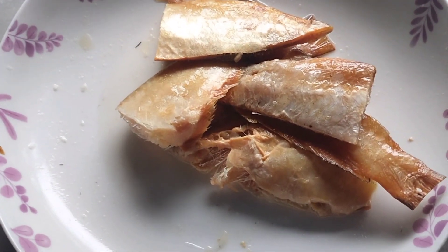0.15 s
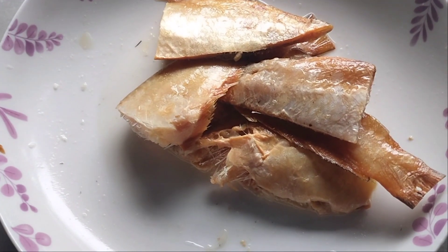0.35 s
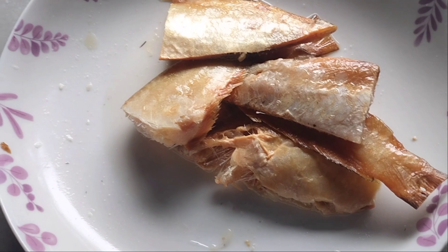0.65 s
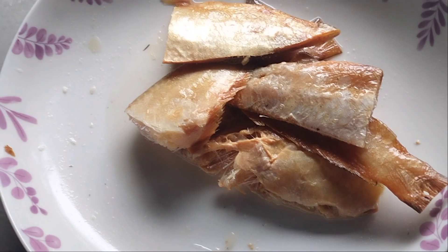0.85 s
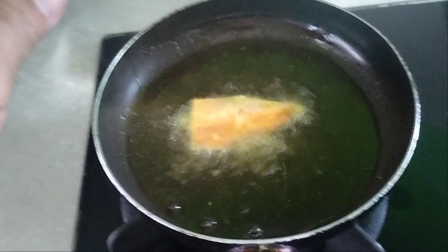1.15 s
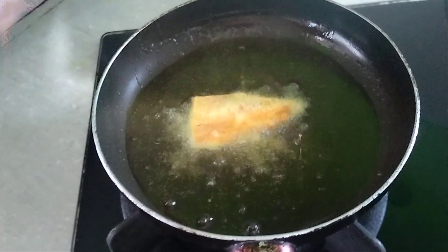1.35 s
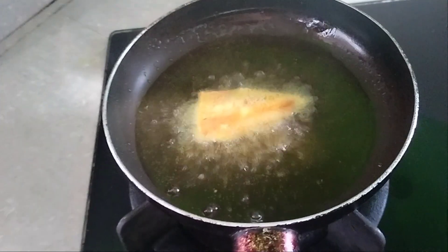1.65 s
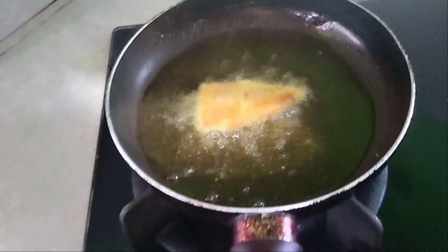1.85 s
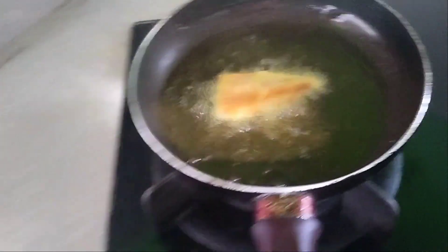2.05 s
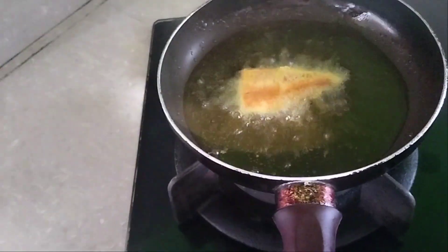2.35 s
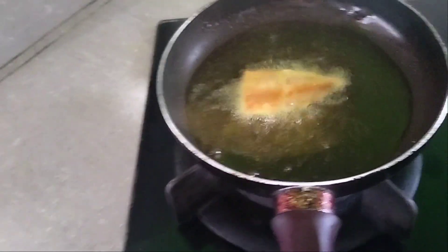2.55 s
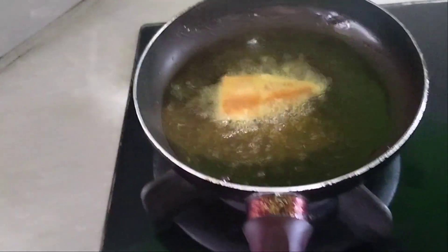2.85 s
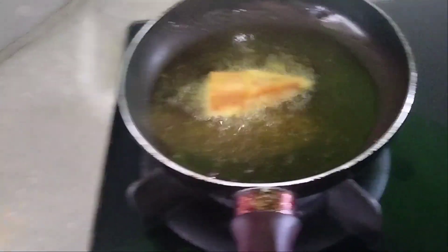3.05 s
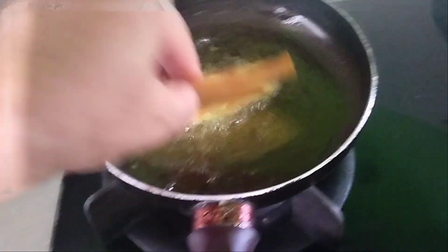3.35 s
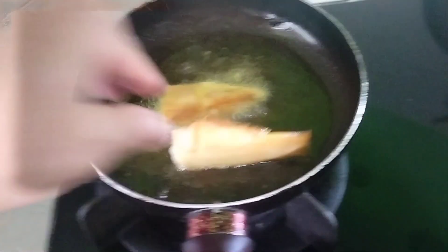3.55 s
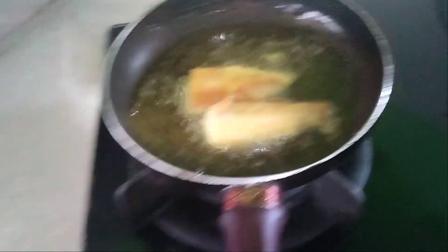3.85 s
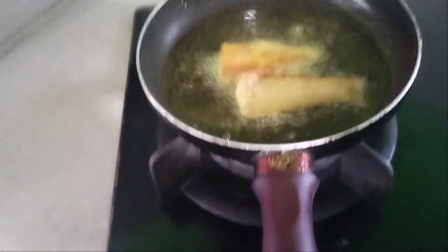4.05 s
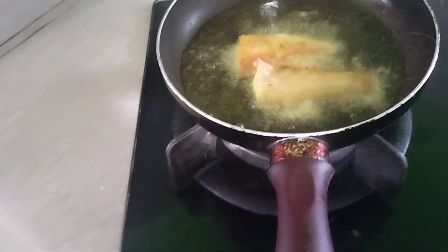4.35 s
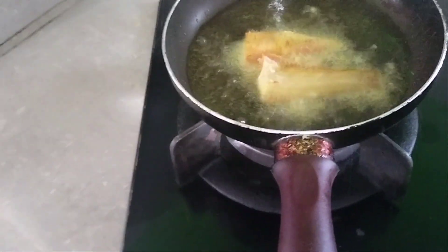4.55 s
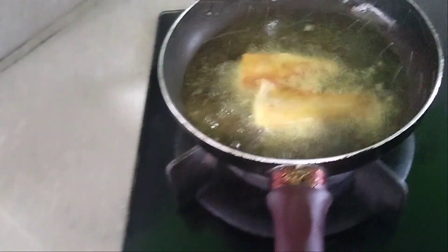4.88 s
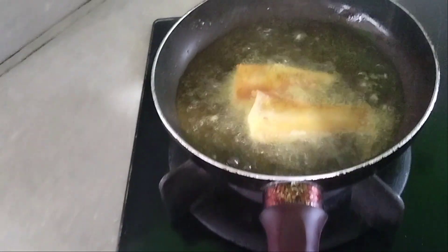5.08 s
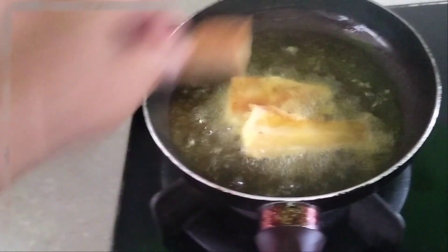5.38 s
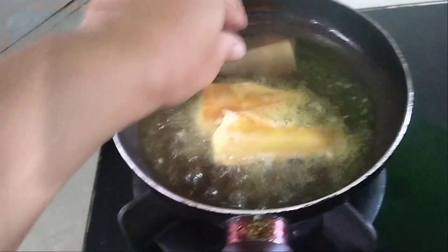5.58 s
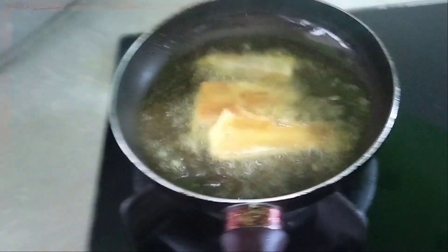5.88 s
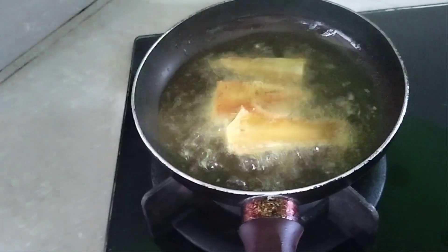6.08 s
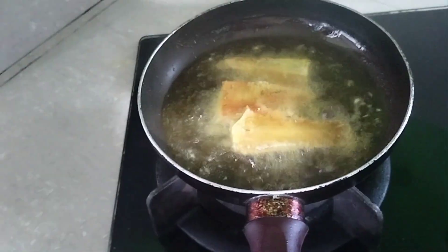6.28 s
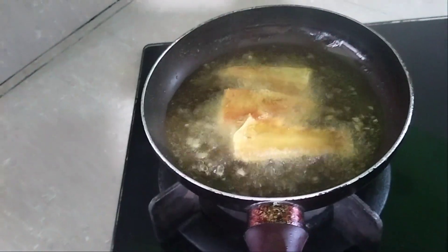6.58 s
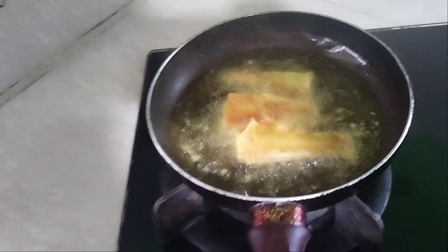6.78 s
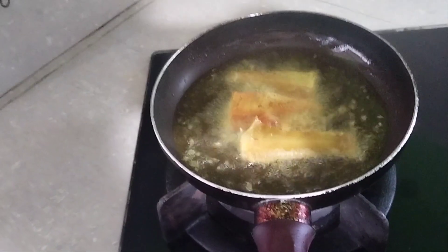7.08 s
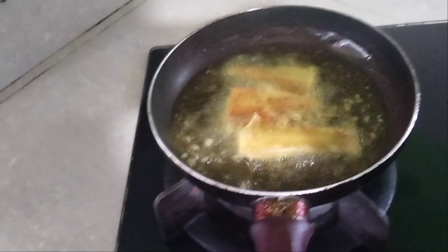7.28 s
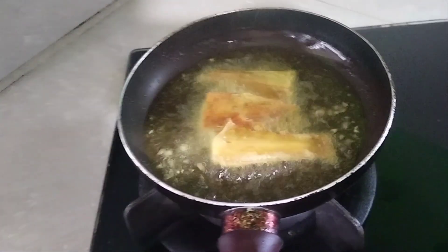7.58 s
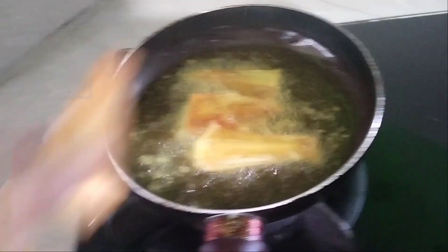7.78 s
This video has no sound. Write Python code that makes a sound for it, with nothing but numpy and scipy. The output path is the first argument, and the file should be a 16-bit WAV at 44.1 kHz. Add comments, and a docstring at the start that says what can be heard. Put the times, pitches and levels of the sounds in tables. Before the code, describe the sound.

Near-silent room, a light tap, then suddenly a close pan of hot oil boiling, crackling and popping hard, swelling as more fish goes in.

```python
"""Wet salted fish fries in a pan of hot oil, set in abruptly after a quiet kitchen with a faint hum.
Water flashes to steam: noise clicks and dying sines make plops, crackle and fizz; single pops ring out.
Two more pieces go in with a soft thud (low decaying sines), and the boiling swells after each.
Burner, wall echoes and room are shaped noise.
The close microphone's limiter ducks the whole sizzle for a moment after each loud pop."""
import sys
import numpy as np
from scipy import signal
from scipy.fft import rfft, irfft, next_fast_len
from scipy.io import wavfile
from scipy.ndimage import uniform_filter1d, minimum_filter1d, map_coordinates

SR = 44100
rng = np.random.default_rng(int(sys.argv[2]) if len(sys.argv) > 2 else 0)


def dump(signal):
    """Clip the signal to [-1, 1] and save it as 16-bit WAV at the path in sys.argv[1]."""
    limited = np.clip(np.atleast_2d(signal).T, -1, 1)
    pcm = np.round(limited * 32767).astype(np.int16)
    wavfile.write(sys.argv[1], SR, pcm)


N = 349713

START_S = 1.038  # the frying sets in
TOP_HZ = 15850  # band limit
FLURRY_KNOTS_PER_S, SWELL_KNOTS_PER_S = 60, 9  # quick flurries and slower swells of the bubbling
SWELL_DB = 0.37  # scale of the random slow swells
GUSH_LIFT_DB = 1.5  # the fullest gush also lifts boil, crackle, fizz and ticks
GURGLE_DB = -19  # between gushes the wet bubbles, relative to the boil
SMALL_POPS_PER_S, SMALL_POP_T60_S = 20, 0.0089
SMALL_POP_DB, SMALL_POP_SPREAD_DB = 9.5, 2  # ring peak over the bubbling, and its scatter
SMALL_POP_HZ, SMALL_POP_SCATTER = 2034, 0.12  # median pitch, scatter of its natural log
PAN_WIDTH_HZ = 16  # full width of a mode at half amplitude
TICKS_PER_S, TICK_DB = 31, -22.5  # finer droplets; level relative to the fizz
ROOM_DB = -54  # rms of the room noise

# bubbling by bubble size, before flurries and swells: (time [s], boil [dB], crackle [dB], fizz [dB])
FRYING_LEVELS = [(1.05, -24.5, -19, -31.5), (1.17, -22, -13.5, -25), (1.29, -18.5, -13, -26),
                 (1.47, -22.5, -13, -25), (1.62, -22.5, -15.5, -23.5), (1.9, -22.5, -16, -28.5),
                 (2.3, -28.5, -21, -30.5), (2.85, -22.5, -21.5, -32), (3.07, -29, -26, -31),
                 (3.25, -22, -22, -34.5), (3.66, -24, -26, -35), (3.95, -20.5, -18.5, -27),
                 (4.28, -12.5, -18, -29), (4.9, -13, -15.5, -26), (5.5, -20.5, -20.5, -28.5),
                 (6.15, -15, -21.5, -27), (6.8, -17.5, -26.5, -29), (7.92, -17.5, -30, -30.5)]
# water escaping in rushes of large wet bubbles: (start [s], peak of the arch [dB], length [s])
GUSHES = [(1.114, -22.5, 0.14), (1.429, -21, 0.16), (1.921, -27.5, 0.1), (2.908, -24, 0.063),
          (3.366, -30, .14), (3.996, -21, 0.69), (4.614, -20.5, 0.18), (5.133, -27, .14),
          (5.665, -23, 0.14), (6.11, -26.5, 0.068), (6.305, -26, 0.082), (7.8, -24, 0.074)]
# colour of the wet bubbles: (frequency [Hz], relative level [dB per Hz])
WET_SPECTRUM = [(60, -45), (300, -25), (430, -13), (600, -14), (780, -7), (980, -0.5), (1150, -2),
                (1320, 15), (1700, 8.5), (2600, -34), (6000, -61)]
# colour of the boil: (frequency [Hz], relative level [dB per Hz])
BOIL_SPECTRUM = [(60, -80), (400, -38), (800, -34), (1150, -19), (1480, -10), (1720, 1), (1920, 6),
                 (2120, -1), (2380, -0.5), (2800, -18.5), (3400, -7.5), (5000, -41.5), (7500, -23),
                 (11000, -93.5)]
# colour of the crackle and of pop spatter: (frequency [Hz], relative level [dB per Hz])
CRACKLE_SPECTRUM = [(60, -81), (250, -39), (500, -21.5), (900, -10.5), (1500, -6), (2100, 2), (2600, 1),
                    (3000, -0.5), (3500, -0.5), (4100, -6.5), (4900, -19.5), (6200, -16.5), (7600, -20.5),
                    (15500, -34.5)]
# colour of the spray: (frequency [Hz], relative level [dB per Hz])
FIZZ_SPECTRUM = [(40, -35), (200, -24.5), (1500, -24), (4000, -10.5), (5200, -14), (6300, -11.5),
                 (7100, -3.5), (7600, -0.5), (8100, -4.5), (8700, -12.5), (9500, -14.5), (10500, -19),
                 (12000, -17), (15800, -18)]
# colour of the finer droplets: (frequency [Hz], relative level [dB per Hz])
TICK_SPECTRUM = [(60, -80), (4000, -25), (9000, -6), (13000, -2), (15800, 3)]
# pan modes under the bubbles: (frequency [Hz], level relative to the drive [dB])
PAN_MODES = [(450, -32), (541, -32.5), (588, -26.5), (721, -30), (783, -22.5), (970, -20.5), (1134, -29),
             (1347, -13.5), (1528, -9.5)]
# largest steam pockets bursting: (time [s], ring peak before the high-pass [dB], pitch [Hz], ring t60 [s])
LARGE_POPS = [(1.2248, 6, 2070, 0.011), (1.3399, -1.5, 2620, .01), (1.4322, -2, 2620, 0.022),
              (1.438, -0.5, 1790, .025), (1.7432, 2, 2120, 0.026), (1.8021, 0, 1980, 0.04),
              (1.9521, 1, 1800, 0.011), (2.2865, 1, 2080, 0.023), (2.4262, 1, 2250, 0.011),
              (2.5059, -1.5, 2170, 0.014), (2.549, -3, 2030, 0.014), (2.9248, -2.5, 1650, 0.028),
              (3.3734, -1.5, 1940, 0.045), (3.4093, -2.5, 2070, .013), (3.5802, 4.5, 2000, 0.014),
              (4.0298, -3.5, 2050, 0.0077), (4.1914, 3.5, 1960, .016), (4.7371, 1, 1490, 0.018),
              (5.0329, 3.5, 1900, 0.026), (5.2629, 5, 1910, .013), (5.3869, -1, 1860, 0.02),
              (5.4454, -0.5, 1960, .021), (5.6319, -1.5, 1930, 0.0083), (5.7698, 0.5, 1600, .026),
              (6.0173, 4, 2180, 0.012), (6.1843, 5, 1820, 0.021), (6.2834, -1, 1950, .02),
              (6.4036, 4.5, 2020, 0.009), (6.4472, -0.5, 2290, 0.014), (7.0182, -1.5, 1990, 0.023),
              (7.0956, -0.5, 2040, 0.012), (7.1917, -0.5, 2340, .01), (7.2673, -8.5, 1500, 0.0047),
              (7.3922, -3.5, 1840, 0.014), (7.5452, -1, 1880, 0.017), (7.5766, 1.5, 2050, 0.0076),
              (7.677, 2, 1910, 0.015)]
# droplets spitting: (time [s], nominal peak, 7 dB over the initial rms [dB], pitch [Hz])
SPITS = [(1.5024, -16, 15100), (1.6446, -19, 9220), (2.5954, -20, 12500), (2.8337, -12.5, 12800),
         (3.0938, -18, 9170), (6.525, -18, 11800), (6.686, -15.5, 9770), (7.361, -14, 13100)]
# colour of the gas flame: (frequency [Hz], relative level [dB per Hz])
BURNER_SPECTRUM = [(25, -40), (50, -22), (100, 6.5), (160, -7), (230, 3), (330, -9), (800, -5), (4000, -44)]
# wall reverberation: (frequency [Hz], t60 [s])
WALL_DECAY = [(200, 0.2), (2000, 0.11), (8000, 0.22), (15000, 0.041)]
# handling thuds: (time [s], envelope peak [dB], pitch [Hz], t60 [s])
THUDS = [(0.91, -42, 155, 0.041), (3.497, -37.5, 124, 0.12), (5.637, -38, 124, 0.16)]
# rustles and a tap: (time [s], rms at the envelope peak [dB], centre [Hz], width [Hz], rise [s], t60 [s])
TOUCHES = [(.39, -48, 1870, 170, .003, .2), (.4, -56, 3350, 700, .04, 0.27),
           (.909, -36, 1360, 1100, .0003, 0.019)]
# colour of the room noise: (frequency [Hz], relative level [dB per Hz])
KITCHEN_SPECTRUM = [(25, -27), (55, -14), (95, 1), (250, 0.5), (390, -1), (500, -3.5), (1500, -4.5),
                    (1870, -4.5), (2350, -15.5), (2700, -11), (3200, -7), (4300, -20), (5400, -32),
                    (7500, -18.5), (8900, -30), (15800, -31)]
# narrow bands of the hum: (centre [Hz], width [Hz], rms level [dB])
HUM_BANDS = [(152, 45, -68), (262, 30, -60.5), (382, 53, -64.5), (940, 60, -68), (1850, 150, -58.5)]
# thin far chirp: (time [s], carrier frequency [Hz], rms of its noise modulator [dB])
CHIRP_TRACK = [(.82, 5400, -85), (.85, 5550, -68), (.875, 5800, -58), (.888, 6260, -54), (.905, 6300, -54),
               (.93, 6100, -60), (1.04, 6260, -65), (1.1, 6330, -100)]


def amp(db):
    """Decibels to gain."""
    return 10 ** (np.asarray(db) / 20)


def unit(x):
    """Scaled to rms 1."""
    return x / np.sqrt(np.mean(x ** 2) + 1e-20)


def along(points, hz):
    """(Hz, value) points read on a log frequency axis."""
    point_hz, value = np.transpose(points)
    return np.interp(np.log(hz + 1), np.log(point_hz + 1), value)


def curves(rows):
    """One value per sample for each column after the time."""
    time_s, *columns = np.transpose(rows)
    return [np.interp(np.arange(N) / SR, time_s, column) for column in columns]


def wobble(knots_per_s):
    """A smooth random curve through normal knots."""
    knots = rng.standard_normal(4096)
    return map_coordinates(knots, [np.arange(N) * knots_per_s / SR], mode="mirror")


def filtered(x, response):
    """x times a response of frequency, zero phase."""
    size = next_fast_len(len(x) + 8192)
    spectrum = rfft(x, size) * response(np.fft.rfftfreq(size, 1 / SR))
    return irfft(spectrum, size)[:len(x)]


def rung(x, spectrum, size=4096):
    """x through a minimum-phase colour: each click starts sharply and rings out."""
    cepstrum = irfft(np.log(amp(along(spectrum, np.fft.rfftfreq(size, 1 / SR)))))
    cepstrum[1:size // 2] *= 2  # fold to causal
    cepstrum[size // 2 + 1:] = 0
    impulse = irfft(np.exp(rfft(cepstrum)))
    return signal.fftconvolve(x, impulse)[:len(x)]


def band(hz, width_hz, size):
    """Noise of rms 1 around one frequency; full width at half amplitude."""
    noise = rng.standard_normal(size)
    return unit(filtered(noise, lambda f: 1 / (1 + (2 * (f - hz) / width_hz) ** 2)))


def add(track, time_s, sound):
    """Mix a sound into the track."""
    part = track[max(round(time_s * SR), 0):][:len(sound)]
    part += sound[:len(part)]


def sizzle():
    """Steam leaves the fish in bubbles of four sizes; they come in shared flurries."""
    boil_db, crackle_db, fizz_db = curves(FRYING_LEVELS)
    flurry, gush = wobble(FLURRY_KNOTS_PER_S), gushes()
    wetness = np.hypot(amp(boil_db + GURGLE_DB), gush)
    glugs = bubbles(pitch_hz=944, scatter=0.286, cycles=1.97, spread_db=3, count=3000, size=600)
    plops = bubbles(pitch_hz=1834, scatter=0.285, cycles=3.4, spread_db=3.5)
    blips = bubbles(pitch_hz=2800, scatter=0.25, cycles=3, spread_db=5.5, count=2600)
    tears = clicks(per_s=1800, spread_db=6, ceiling=1.9, scatter=0.8, scatter_t60_s=0.025)
    snaps = clicks(per_s=1000, spread_db=7, ceiling=2.1, scatter=0.8, scatter_t60_s=0.025)
    spray = clicks(per_s=2400, spread_db=6.5, ceiling=2.5, scatter=0.9, scatter_t60_s=0.018)
    droplets = clicks(TICKS_PER_S, spread_db=2, ceiling=1.6, scatter=0.6, scatter_t60_s=0.008)
    # each size of bubble rings in its own range of the spectrum
    gurgle = unit(rung(glugs + 1.84 * tears, WET_SPECTRUM)) * wetness * amp(1.0 * flurry)
    boil = unit(rung(0.38 * plops + tears, BOIL_SPECTRUM)) * amp(boil_db + 0.99 * flurry)
    crackle = unit(rung(snaps + 0.27 * blips, CRACKLE_SPECTRUM)) * amp(crackle_db + 0.76 * flurry)
    fizz = unit(rung(spray, FIZZ_SPECTRUM)) * amp(fizz_db + 0.3 * flurry)
    ticks = unit(rung(droplets, TICK_SPECTRUM)) * amp(fizz_db + TICK_DB)
    ring = pan_ring() * np.hypot(wetness, amp(crackle_db - 12.5))
    surge_db = SWELL_DB * wobble(SWELL_KNOTS_PER_S) + GUSH_LIFT_DB * gush / gush.max()
    return gurgle + ring + (boil + crackle + fizz + ticks) * amp(surge_db)


def gushes():
    """Gain of the wet rushes: each swells and ebbs in one half-sine arch."""
    t = np.arange(N) / SR
    return sum(amp(db) * np.sin(np.pi * np.clip((t - start_s) / length_s, 0, 1))
               for start_s, db, length_s in GUSHES)


def bubbles(pitch_hz, scatter, cycles, spread_db, count=3000, size=400):
    """Single bubbles, each a few dying cycles at its own pitch."""
    start = rng.integers(0, N, (count, 1))
    tune, strength, life = rng.standard_normal((3, count, 1))
    turns = pitch_hz * np.exp(scatter * tune) * np.arange(size) / SR
    decay = np.exp(-turns / (cycles * np.exp(0.29 * life)))
    rings = np.sin(2 * np.pi * turns) * decay * (1 - np.exp(-turns))
    rings *= amp(spread_db * np.minimum(strength, 2))
    return unit(np.bincount((start + np.arange(size)).ravel(), rings.ravel(), N + size)[:N])


def clicks(per_s, spread_db, ceiling, scatter, scatter_t60_s):
    """Randomly timed bursts, many small and a few large, each with its own scatter off the pan."""
    happens = rng.random(N) < per_s / SR
    strength_db = spread_db * np.minimum(rng.standard_normal(N), ceiling)
    direct = unit(happens * amp(strength_db) * rng.choice([-1, 1], N))
    fading_power = amp(-60 * np.arange(SR // 10) / SR / scatter_t60_s) ** 2
    lingering = np.sqrt(np.abs(signal.fftconvolve(direct ** 2, fading_power)[:N]))
    return unit(direct + scatter * unit(lingering * rng.standard_normal(N)))


def pan_ring():
    """The pan's low modes, kept ringing by countless small blows: narrow noise bands."""
    return sum(amp(db) * band(hz, PAN_WIDTH_HZ, size=N) for hz, db in PAN_MODES)


def pops():
    """A steam pocket tears open with a crack, and its cavity rings for a few cycles."""
    out, t = np.zeros(N), np.arange(SR // 16) / SR
    for time_s, db, hz, t60_s in list(LARGE_POPS) + small_pops():
        envelope = (1 - np.exp(-t / 0.00063)) ** 2 * amp(-60 * t / t60_s)
        ring = np.sin(2 * np.pi * hz * t) * envelope
        spatter = unit(rung(rng.standard_normal(len(t)), CRACKLE_SPECTRUM)) * amp(-60 * t / 0.054)
        burst = ring / np.abs(ring).max() + 0.12 * spatter
        add(out, time_s, amp(db) * burst)
    # small cavities radiate no bass
    return signal.sosfilt(signal.butter(3, 600, "highpass", fs=SR, output="sos"), out)


def small_pops(count=300):
    """Rows like LARGE_POPS at random times; the harder the oil bubbles, the louder they are."""
    boil_db, crackle_db, _ = curves(FRYING_LEVELS)
    bubbling_db = 20 * np.log10(np.hypot(amp(boil_db), amp(crackle_db)))
    times_s = START_S + np.cumsum(rng.exponential(1 / SMALL_POPS_PER_S, count))
    rows = []
    for time_s, (strength, tune, life) in zip(times_s, rng.standard_normal((count, 3))):
        if time_s < N / SR:
            db = bubbling_db[int(time_s * SR)] + SMALL_POP_DB + SMALL_POP_SPREAD_DB * strength
            hz = SMALL_POP_HZ * np.exp(SMALL_POP_SCATTER * tune)
            rows.append((time_s, db, hz, SMALL_POP_T60_S * np.exp(0.17 * life)))
    return rows


def spits():
    """Tiny droplets burst with a bright tick: decaying band noise."""
    out, t = np.zeros(N), np.arange(SR // 20) / SR
    for time_s, db, hz in SPITS:
        tick = band(hz, width_hz=3500, size=len(t)) * amp(-60 * t / 0.017)
        add(out, time_s, amp(db - 7) * tick)
    return out


def handling():
    """Soft low thuds (decaying sines), faint rustles and a light tap (band noise)."""
    out, t = np.zeros(N), np.arange(SR // 3) / SR
    for time_s, db, hz, t60_s in THUDS:
        swell = (1 - np.exp(-t / 0.016)) ** 2 * amp(-60 * t / t60_s)
        add(out, time_s, amp(db) * swell / swell.max() * np.sin(2 * np.pi * hz * t))
    for time_s, db, hz, width_hz, rise_s, t60_s in TOUCHES:
        swell = (1 - np.exp(-t / rise_s)) * amp(-60 * t / t60_s)
        add(out, time_s, amp(db) * swell / swell.max() * band(hz, width_hz, size=len(t)))
    return out


def reflected(x, wet_db, size=8192):
    """Wall echoes as noise tails; they keep changing, as each burst comes from another spot in the pan."""
    out, t = np.zeros(N), np.arange(size) / SR
    window = signal.windows.hann(size, sym=False)
    padded = np.pad(x, (0, size))
    for first in range(0, N, size // 2):  # a fresh tail for each overlapping block
        hz, tail_s, noise = signal.stft(rng.standard_normal(size), SR, nperseg=256)
        decay = amp(-60 * tail_s / along(WALL_DECAY, hz)[:, None])
        tail = signal.istft(noise * decay, SR, nperseg=256)[1][:size]
        tail = tail * (t > 0.003)  # no echo in the first 3 ms
        block = padded[first:first + size] * window
        add(out, first / SR, signal.fftconvolve(block, tail / np.linalg.norm(tail)))
    return amp(wet_db) * out


def burner(level_db):
    """The low, even rush of the gas flame: coloured steady noise."""
    noise = rng.standard_normal(N)
    return amp(level_db) * unit(filtered(noise, lambda hz: amp(along(BURNER_SPECTRUM, hz))))


def kitchen():
    """Even room noise, a wavering hum of narrow bands and a thin, breezy chirp far off."""
    noise = rng.standard_normal(N)
    air = unit(filtered(noise, lambda hz: amp(along(KITCHEN_SPECTRUM, hz)))) * amp(ROOM_DB)
    hum = sum(amp(db) * band(hz, width_hz, size=N) for hz, width_hz, db in HUM_BANDS)
    chirp_hz, chirp_db = curves(CHIRP_TRACK)
    carrier = np.sin(2 * np.pi * np.cumsum(chirp_hz) / SR)
    chirp = amp(chirp_db) * band(0, width_hz=590, size=N) * carrier
    return air + hum + chirp


def scene():
    """First the quiet room, then all at once the pan on its burner."""
    pan = sizzle() + pops() + spits()
    stove = pan + reflected(pan, wet_db=-9) + burner(level_db=-58.0)
    before = np.arange(N) / SR < START_S
    return (np.where(before, kitchen(), stove) + handling())[None]


def limited(x, ceiling, hold_s, release_s, ahead_s):
    """The gain drops just ahead of a peak, stays down a moment and swings back."""
    needed_db = 20 * np.log10(np.maximum(np.abs(x) / ceiling, 1))
    hold, ahead = int(hold_s * SR), int(ahead_s * SR)
    held_db = -minimum_filter1d(-needed_db, size=hold, origin=(hold - 1) // 2)
    # the reduction in dB decays exponentially
    fall = np.arange(N) / SR / release_s
    duck_db = np.exp(np.maximum.accumulate(np.log(held_db + 1e-9) + fall) - fall)
    gain = minimum_filter1d(amp(-duck_db), size=ahead)
    return x * uniform_filter1d(gain, size=ahead)


def record(dry):
    """The microphone's limiter, then the band limit."""
    held = limited(dry[0], ceiling=0.95, hold_s=0.078, release_s=0.008, ahead_s=0.003)
    return filtered(held, lambda hz: hz < TOP_HZ)[None]


dry = scene()
out = record(dry)
dump(out)
```